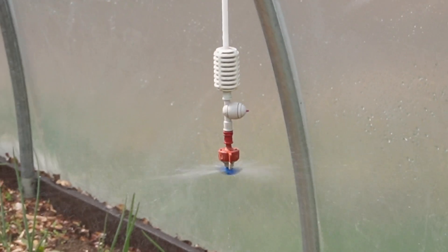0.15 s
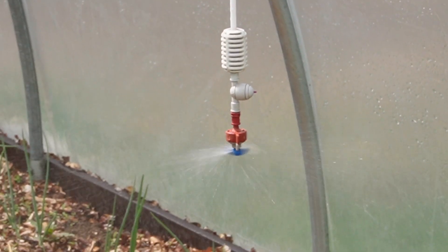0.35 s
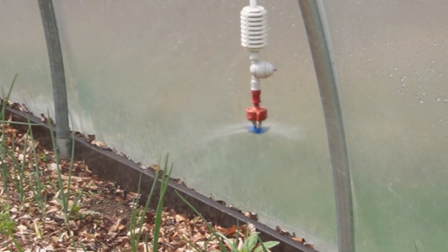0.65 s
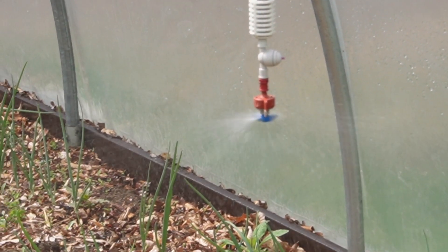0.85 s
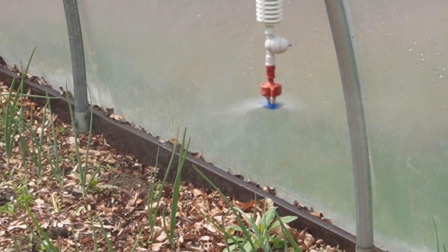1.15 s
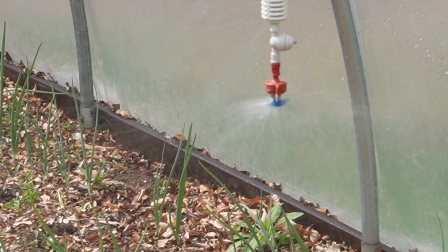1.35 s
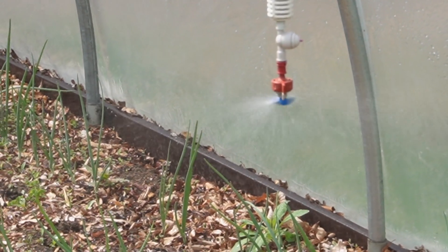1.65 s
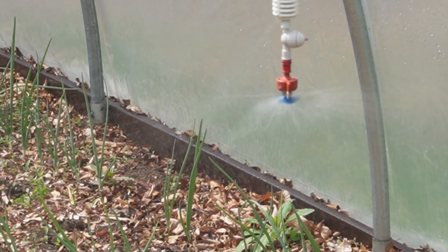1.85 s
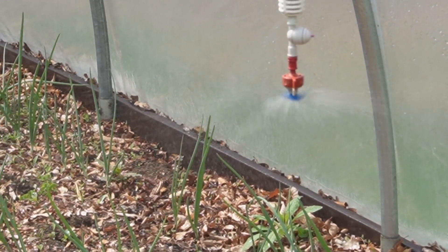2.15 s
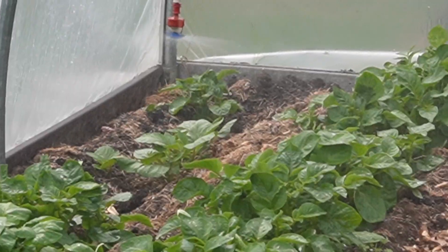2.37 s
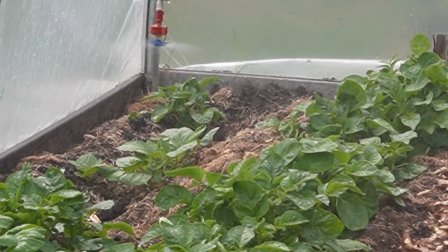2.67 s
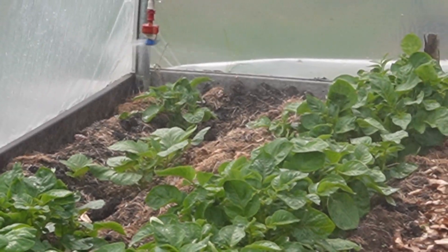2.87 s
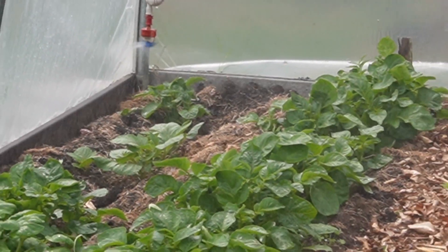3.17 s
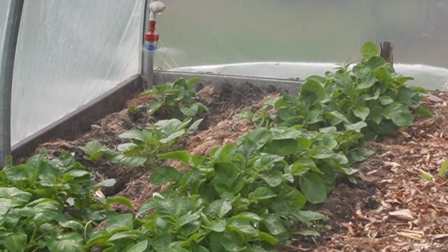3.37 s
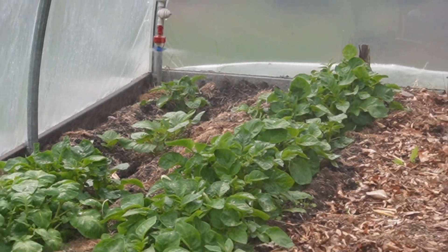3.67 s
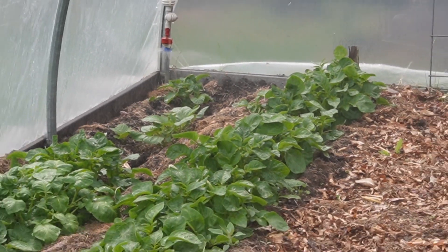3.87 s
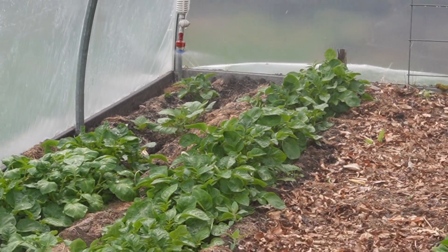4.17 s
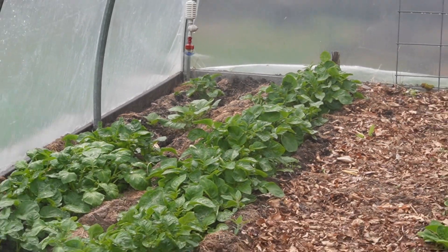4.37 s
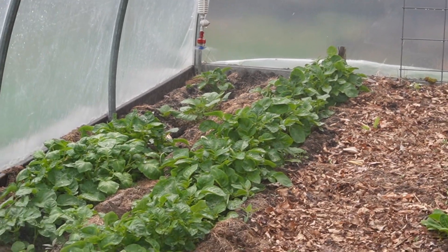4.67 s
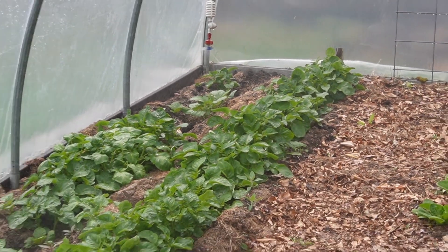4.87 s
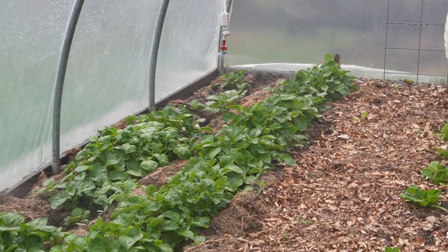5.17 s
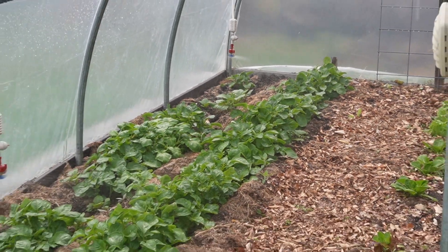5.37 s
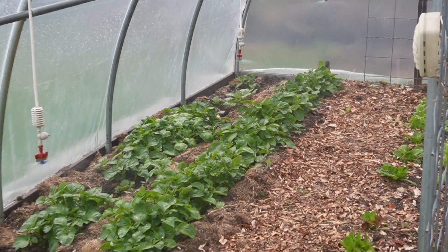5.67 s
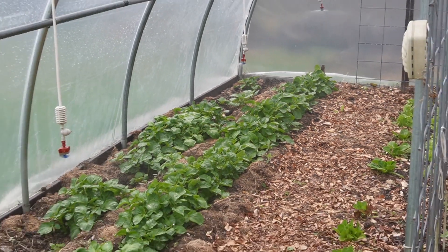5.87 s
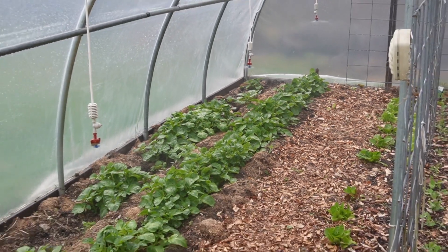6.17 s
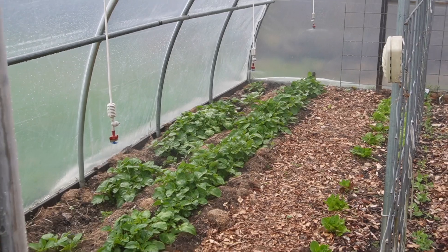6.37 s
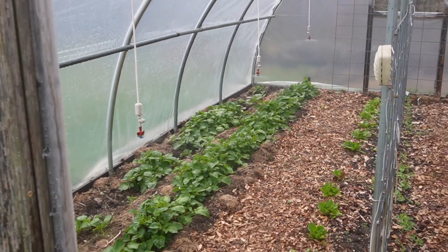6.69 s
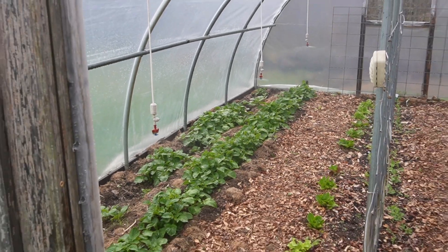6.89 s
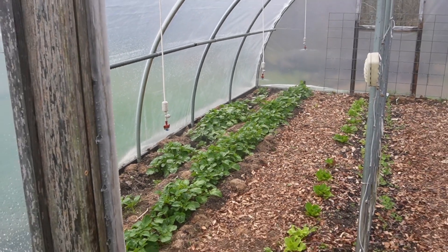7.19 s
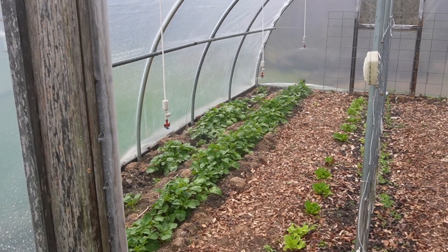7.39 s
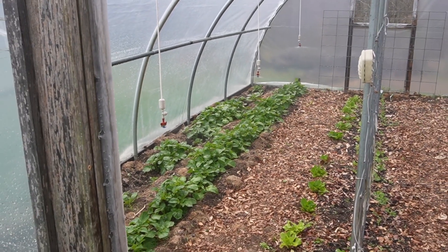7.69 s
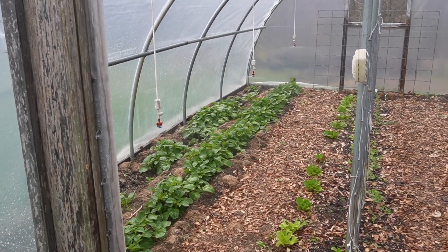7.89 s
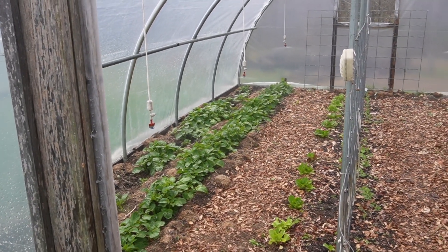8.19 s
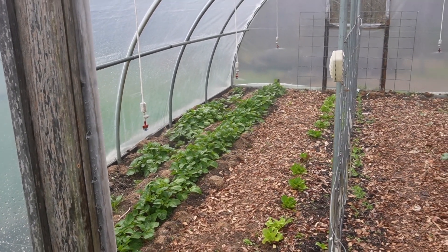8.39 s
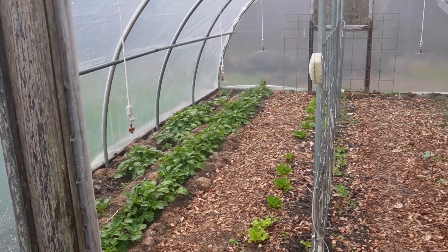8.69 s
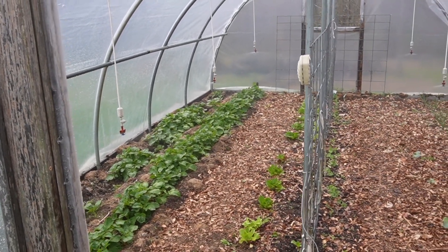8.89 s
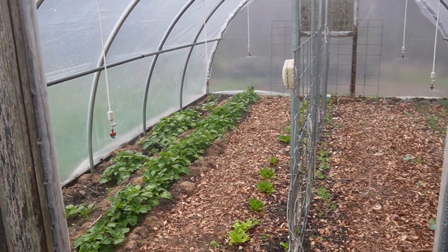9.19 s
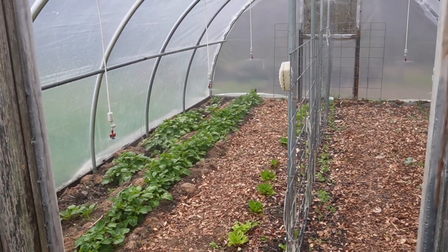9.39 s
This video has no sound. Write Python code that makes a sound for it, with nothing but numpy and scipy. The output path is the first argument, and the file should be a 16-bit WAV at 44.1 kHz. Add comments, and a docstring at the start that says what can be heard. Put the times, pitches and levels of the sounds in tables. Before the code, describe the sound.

A sprinkler head sputters and hisses close by over dense water patter, then cuts to quieter distant spray with small creaks of handling.

```python
"""In a plastic greenhouse tunnel, overhead sprinklers spin: ringing drops over a noise wash patter on sheeting,
leaves and mulch. A head sputters, its tiny impacts and noise gated into spurts; air pops and spray splashes broadly.
Narrow noise bands whistle, fizz and hum; outdoor air rumbles low. Two scenes play: beside one head, then, after a
cut, further down the beds, where the camera shell creaks in the hand as filtered noise bursts and rubs."""
import sys
import numpy as np
from scipy import signal
from scipy.fft import rfft, irfft, next_fast_len
from scipy.io import wavfile
from scipy.ndimage import uniform_filter1d, map_coordinates

SR = 44100
rng = np.random.default_rng(int(sys.argv[2]) if len(sys.argv) > 2 else 0)


def wrap_up_sound(samples):
    """Save the sound to the file named by the first command line argument, as 16-bit audio."""
    columns = np.atleast_2d(samples).T
    # keep every value between -1 and 1, then stretch to whole-number steps
    tamed = np.clip(columns, -1, 1)
    steps = np.round(tamed * 32767).astype(np.int16)
    wavfile.write(sys.argv[1], SR, steps)


N = 420960

CUT_S = 2.355  # the move from beside the head to the beds

# spurts of the sprinkler head: start_s, length_s, level_db, gulps (how many it breaks into)
SPURTS = [(0, 0.012, -20.5, 1), (0.249, 0.065, -22, 1), (0.356, 0.18, -25.5, 2), (.507, 0.294, -22, 1),
          (0.806, .165, -22.5, 1), (.995, .048, -25.5, 1), (1.22, 0.046, -24, 1), (1.594, 0.096, -31, 1),
          (1.748, 0.16, -27, 1), (1.915, 0.055, -23, 1), (2.006, 0.2, -22.5, 1), (2.294, 0.048, -23, 1),
          (2.411, 0.061, -30, 1), (2.577, .034, -33.5, 1), (2.972, 0.2, -31, 3), (3.237, 0.1, -28.5, 1),
          (3.394, 0.03, -28.5, 1), (3.529, .12, -28.5, 3), (3.673, .16, -27.5, 2), (3.911, 0.031, -28, 1),
          (4.251, 0.096, -30, 1), (5.17, .037, -30.5, 1), (5.236, 0.1, -28, 1), (5.385, .042, -27.5, 1),
          (5.718, .023, -29, 1), (5.91, .13, -28, 1), (6.078, .064, -28, 1), (6.357, .031, -33, 1),
          (6.653, 0.087, -35, 2), (6.786, .11, -28, 1), (7.138, 0.088, -28, 2), (7.523, 0.021, -28, 1),
          (7.778, 0.14, -28.5, 1), (7.971, 0.022, -28.5, 1), (8.195, .03, -32, 1), (8.298, 0.037, -30.5, 1),
          (8.424, .061, -28.5, 1), (8.54, .142, -31, 3), (8.958, 0.058, -32, 2), (9.224, .023, -32.5, 1),
          (9.342, 0.2, -33.5, 2)]
# colour of the head's jet: freq_hz, relative density_db per Hz
JET_COLOUR = [(1500, -35.5), (2600, -10.5), (2950, -14), (3500, -0.5), (3900, 2.5), (4500, -3), (5200, -5),
              (6600, -12.5), (9200, -11), (11200, -6.5), (13000, -12.5), (15800, -17)]
# air pockets popping in the nozzle: start_s, peak_db (before the trim in pops)
AIR_POPS = [(0.5531, -2), (3.6865, -12), (7.5263, -17), (7.9044, -12), (8.4392, -12)]
# echo of the jet off a close surface, its path changing as the camera moves: time_s, delay_ms
ECHO_DELAY = [(1.9, .563), (2.4, .612), (5.3, .628), (7.1, .647), (7.9, .632), (9.4, .548)]
# sideways place of the head: time_s, left_minus_right_db
HEAD_LEAN = [(0, 1.1), (.8, 2), (1.6, .9), (2.3, 1.2), (2.4, .1)]
# whistle of the nozzle: centre_hz, width_hz, relative level_db
WHISTLE_BANDS = [(7650, 230, -2), (8600, 530, -12)]
# fizz of the spinner: centre_hz, width_hz, relative level_db
FIZZ_BAND = [(12600, 2000, 0)]
# broad splashes of spray, and one short bright squirt just after the cut:
# start_s, length_s, level_db, pitch_ratio
SPLASHES = [(0.406, 0.047, -24.5, 1.03), (1.131, 0.028, -24, 1.02), (1.604, 0.041, -25.5, 1.1),
            (2.091, 0.035, -21.5, 1), (2.401, 0.025, -31, 2.1)]
# colour of a splash at pitch ratio 1: freq_hz, relative density_db per Hz
SPLASH_COLOUR = [(1000, -24), (1600, -4), (2100, 3), (3100, 6.5), (5000, -4.5), (9000, -1), (11000, -38),
                 (16000, -32)]
# patter of all the drops beside the head: freq_hz, relative density_db per Hz
PATTER_NEAR = [(180, -48), (300, -17), (592, -7), (643, -7), (1080, -2), (1470, -2), (2200, 1), (2720, -1),
               (3920, -2.5), (5740, -8), (8140, -8), (8840, -11.5), (13800, -8), (15800, -15.5)]
# patter of all the drops down the beds: freq_hz, relative density_db per Hz
PATTER_FAR = [(180, -22.5), (300, -14.5), (493, -12), (633, -6), (711, -6.5), (927, -3.5), (1470, -2.5),
              (1920, -0.5), (2910, -1.5), (3270, -0.5), (5120, -7), (7740, -8.5), (9140, -11.5),
              (13200, -11), (15800, -16.5)]
# single creaks and one dull thump of the camera shell:
# start_s, tick_peak_db, thud_peak_db (before the trims in handling)
SINGLE_CREAKS = [(4.582, -15, -41), (4.593, -16, -45), (4.733, -17, -37), (4.99, -18, -34),
                 (5.119, -18, -37), (5.477, -21, -36), (5.555, -19, -35), (5.887, -19, -33),
                 (6.134, -17, -36), (7.07, -34, -36), (7.211, -21, -45)]
# bright resonances of the shell: centre_hz, width_hz, relative level_db
SHELL_TICK = [(2000, 660, 1.5), (2580, 860, 5), (3400, 570, -2.5)]
# dull resonances of the shell: centre_hz, width_hz, relative level_db
SHELL_THUD = [(235, 60, -3), (335, 55, 1), (700, 280, 1), (980, 250, 0), (1350, 300, -1)]
# how hard the hand rubs the shell: time_s, level_db (before the trim in handling)
GRIP_LEVEL = [(4.45, -67), (4.75, -52.5), (5.1, -48.5), (5.3, -59.5), (5.75, -53), (6.5, -52.5),
              (6.75, -61), (7.08, -54), (7.4, -67)]
# colour of the low outdoor rumble: freq_hz, relative density_db per Hz
RUMBLE_COLOUR = [(15, -52), (25, -26), (44, -9), (69, 1), (113, -3), (149, -1), (232, -2.5), (263, -3.5),
                 (400, -20), (520, -36), (880, -120)]
# loudness of the low outdoor rumble: time_s, level_db
RUMBLE_LEVEL = [(0, -57), (1.3, -55), (2.34, -56), (2.38, -64), (2.9, -70), (3.2, -66.5), (4.5, -63.5),
                (5.5, -61.5), (9.5, -64)]
# faint far hum: centre_hz, width_hz, relative level_db
HUM_BAND = [(143, 22, 0)]
# stereo width, nearly mono in the middle, wider low down and in the top treble: freq_hz, side_minus_mid_db
STEREO_WIDTH = [(60, -35), (300, -10.5), (1000, -38.5), (3000, -48), (8000, -56), (12000, -35), (13200, -4),
                (16000, -13)]

GULP_GAP_S = 0.02  # air in the line breaks the flow for this long
SAG_DB_PER_S = 8.5  # a gulp weakens as its pressure drains
DRIBBLE_DB, DRIBBLE_T60_S = -10.5, 0.74  # dribble after a spurt: level relative to it, decay time
SPITS_PER_S, SPIT_S, SPIT_MAX_DB = 1.5, .025, -38.5  # faint stray spits
ECHO_NEAR, ECHO_FAR = .28, .5  # echo gain beside the head and down the beds
NEAR_DB, FAR_DB = -29, -36.5  # patter level beside the head and down the beds
STICK_DB, STICKS_PER_S = 2.5, 14  # the hand sticks and slides unevenly
SOFT_CREAKS_PER_S, SOFT_TICK_DB, SOFT_THUD_DB = 8, -25.5, -39  # mean peaks, before the trims in handling
FIRM_FROM_S, FIRM_TO_S = 4.7, 6.7  # the grip is firm
TOP_HZ = 15850


def amp(db):
    """Decibels to gain."""
    return 10 ** (np.asarray(db) / 20)


def unit(x):
    """Scale to rms 1."""
    return x / np.sqrt(np.mean(x ** 2) + 1e-20)


def along(points, hz):
    """Gain of (Hz, dB) points joined on a log frequency axis."""
    f, db = np.transpose(points)
    return amp(np.interp(np.log(hz + 1), np.log(f), db))


def curve(rows):
    """One value per sample from (s, value) rows."""
    return np.interp(np.arange(N) / SR, *np.transpose(rows))


def wobble(rate, size=N):
    """A smooth random curve with rate knots a second."""
    knots = rng.standard_normal(int(size * rate / SR) + 4)
    return map_coordinates(knots, [np.arange(size) * rate / SR])


def filtered(x, response):
    """Shape the spectrum of x by a function of frequency."""
    n = x.shape[-1]
    m = next_fast_len(n + 4096)
    return irfft(rfft(x, m) * response(np.fft.rfftfreq(m, 1 / SR)), m)[..., :n]


def humps(modes, hz):
    """Gain of broad (Hz, width, dB) resonances whose powers add."""
    return np.sqrt(sum((amp(db) / (1 + (2 * (hz - centre) / width) ** 2)) ** 2 for centre, width, db in modes))


def ringing(modes, hz):
    """Causal response of (Hz, width, dB) resonances of alternating sign."""
    total = 0
    for k, (centre, width, db) in enumerate(modes):
        damping = 1j * hz * width
        total = total + (-1) ** k * amp(db) * damping / (centre * centre - hz * hz + damping)
    return total


def add(track, s, sound):
    """Mix a sound into a track at time s."""
    start = max(round(s * SR), 0)
    part = track[..., start:start + sound.shape[-1]]
    part += sound[..., :part.shape[-1]]


def stereo(pair, colour):
    """Two unrelated signals become a coloured, mostly mono pair whose mid has rms 1."""
    mid, side = filtered(pair, lambda hz: colour(hz) * np.array([np.ones_like(hz), along(STEREO_WIDTH, hz)]))
    return np.array([mid + side, mid - side]) / np.std(mid)


def hiss(colour):
    """A full-length stereo noise of the given colour."""
    return stereo(rng.standard_normal((2, N)), colour)


def impacts(rate, spread_db, size=N):
    """Random drop impacts of uneven size, rms 1."""
    count = int(rate * size / SR) + 1
    size_db = spread_db * np.clip(rng.standard_normal(count), -2.5, 2.5)
    sizes = amp(size_db) * rng.choice([-1, 1], count)
    return unit(np.bincount(rng.integers(0, size, count), sizes, size))


def gush(length, rise, t60):
    """Envelope of a gush of water: quick rise, hold, short fall."""
    t = np.arange(int((abs(length) + .15) * SR)) / SR
    return np.clip(t / rise, 0, 1) * amp(-60 * np.maximum(t - length, 0) / t60)


def flow():
    """Power of the jet: each spurt comes in equal sagging gulps and dribbles out; stray spits fall at random."""
    power = np.zeros(N)
    t = np.arange(SR // 2) / SR
    for s, length, db, gulps in SPURTS:
        period = (length + GULP_GAP_S) / gulps
        gulp = gush(period - GULP_GAP_S, rise=0.014, t60=0.13)
        gulp = gulp * amp(db - SAG_DB_PER_S * np.arange(len(gulp)) / SR)
        for k in range(gulps):
            add(power, s + k * period, gulp ** 2)
        dribble = amp(db + DRIBBLE_DB - 60 * t / DRIBBLE_T60_S)
        same_scene = (s < CUT_S) == (s + length + t < CUT_S)  # no dribble carries over the cut
        add(power, s + length, (same_scene * dribble) ** 2)
    spit = amp(SPIT_MAX_DB) * gush(SPIT_S, rise=0.017, t60=0.12)
    for when, size in rng.random((int(SPITS_PER_S * N / SR), 2)):
        add(power, when * N / SR, size * spit ** 2)
    return power


def patchy(x, depth_db):
    """The colour of a ragged jet wanders in patches a few hundred Hz wide and some 40 ms long."""
    z = signal.stft(x, nperseg=512)[2]
    field = uniform_filter1d(rng.standard_normal(z.shape[1:]), size=5, axis=0)
    field = uniform_filter1d(field, size=7, axis=1)
    return unit(signal.istft(z * amp(depth_db * unit(field)), nperseg=512)[1][:, :N])


def sputter(throb, body_throb_db=0.5, mist_throb_db=3.0, ragged_db=1.12, swell_db=0.73, mist_hz=7000):
    """Each spurt is a shower of tiny impacts; the spinner chops its fine mist more deeply than its body."""
    spray = np.array([impacts(rate=12000, spread_db=3.0) for _ in range(2)]) + rng.standard_normal((2, N))
    jet = stereo(patchy(spray, depth_db=2.5), lambda hz: along(JET_COLOUR, hz))
    mist = filtered(jet, lambda hz: 1 / (1 + (mist_hz / (hz + 1)) ** 8))
    mist_db = curve([(0, -.5), (2.3, 1.5), (2.4, -2.4), (9.5, -2)])  # the finest hiss fades with distance
    body = (jet - mist) * amp(body_throb_db * throb + ragged_db * wobble(110))
    mist = mist * amp(mist_db + mist_throb_db * throb + ragged_db * wobble(110))
    return np.sqrt(flow()) * amp(swell_db * wobble(30)) * (body + mist)


def pops(t60=.012, trim_db=-4):
    """A pocket of air cracks through the head in the jet's colour."""
    out = np.zeros((2, N))
    t = np.arange(SR // 20) / SR
    envelope = np.clip(t / 0.0006, 0, 1) * amp(-60 * np.maximum(t - .002, 0) / t60)
    for s, db in AIR_POPS:
        burst = stereo(rng.standard_normal((2, len(t))), lambda hz: along(JET_COLOUR, hz))
        crack = np.tanh(0.74 * burst)  # squashes the peaks
        add(out, s, amp(db + trim_db) * envelope * crack)
    return out


def echoed(x):
    """The jet and its close echo interfere in a comb that glides with the camera."""
    at = np.arange(N) - curve(ECHO_DELAY) * SR / 1000
    echo = np.array([map_coordinates(side, [at]) for side in x])
    share = np.where(np.arange(N) / SR < CUT_S, ECHO_NEAR, ECHO_FAR)
    return (x + share * echo) / np.sqrt(1 + share ** 2)


def nozzle(throb):
    """The running head whistles thinly and fizzes in time with its spinner."""
    whistle_db = curve([(2.3, -54), (2.4, -48.5), (5.5, -50.5), (7.5, -53.5), (9.5, -49)])
    whistle = amp(whistle_db + 1.5 * wobble(2.99)) * hiss(lambda hz: humps(WHISTLE_BANDS, hz))
    fizz_db = curve([(2.3, -46), (2.4, -48.5), (9.5, -50)])
    fizz = amp(fizz_db + 5.2 * throb + 2.2 * wobble(97)) * hiss(lambda hz: humps(FIZZ_BAND, hz))
    return whistle + fizz


def splashes():
    """Spray lands in short broad showers of impacts; a higher pitch ratio makes a bright squirt."""
    out = np.zeros((2, N))
    for s, length, db, pitch in SPLASHES:
        envelope = gush(length, rise=0.0064, t60=0.12)
        spray = np.array([impacts(rate=8500, spread_db=3, size=len(envelope)) for _ in range(2)])
        add(out, s, amp(db) * envelope * stereo(spray, lambda hz: along(SPLASH_COLOUR, hz / pitch)))
    return out


def droplets(rate, spread_db, cycles):
    """Each drop rings for a few cycles at its own pitch; together they cover all pitches evenly."""
    count = int(rate * N / SR)
    when, pitch, phase = rng.random((count, 3)).T
    hz = 500 * 32 ** pitch  # 500 Hz to 16 kHz
    size_db = spread_db * np.clip(rng.standard_normal(count), -2.5, 2.5)
    size = amp(size_db) * hz ** 1.5 * np.sign(phase - .5)  # short high rings need more size
    k = np.arange(128)
    turns = hz[:, None] * k / SR
    rings = size[:, None] * np.exp(-turns / cycles) * np.sin(2 * np.pi * turns)
    places = (when * N).astype(int)[:, None] + k
    return unit(np.bincount(places.ravel(), rings.ravel(), N)[:N])


def patter():
    """Near drops stand out of a wash of countless far ones."""
    drops = droplets(rate=2600, spread_db=4, cycles=2.8)
    wash = rng.standard_normal((2, N))
    flicker = amp(0.25 * wobble(7) + 0.45 * wobble(60))
    water = np.array([(wash[0] + amp(-5.5) * drops) * flicker, wash[1]])
    near = amp(NEAR_DB) * stereo(water, lambda hz: along(PATTER_NEAR, hz))
    far = amp(FAR_DB) * stereo(water, lambda hz: along(PATTER_FAR, hz))
    moved = curve([(CUT_S - .005, 0), (CUT_S + .005, 1)])
    return (1 - moved) * near + moved * far


def soft_creaks():
    """Rows like SINGLE_CREAKS for the many softer slips of a firm grip."""
    firm_s = FIRM_TO_S - FIRM_FROM_S
    count = int(SOFT_CREAKS_PER_S * firm_s)
    when, size = rng.random((count, 2)).T
    s = FIRM_FROM_S + (np.arange(count) + when) / count * firm_s
    scatter_db = 6 * (size - .5)
    return list(zip(s, SOFT_TICK_DB + scatter_db, SOFT_THUD_DB + scatter_db))


def handling(tick_trim_db=-3, thud_trim_db=5, slip_t60=0.032, apart=0.58, right_tick_db=-4, rub_trim_db=3):
    """Slips of the hand tick and thud in the shell, reaching each microphone a little differently."""
    out = np.zeros((2, N))
    t = np.arange(SR // 10) / SR
    ports = np.array([[1, apart], [1, -apart]])
    for s, tick_db, thud_db in list(SINGLE_CREAKS) + soft_creaks():
        slip = ports @ rng.standard_normal((2, len(t))) * amp(-60 * t / slip_t60)
        tick = filtered(slip, lambda hz: ringing(SHELL_TICK, hz))
        thud = filtered(slip, lambda hz: ringing(SHELL_THUD, hz))
        add(out, s, amp(tick_db + tick_trim_db) * amp([[0], [right_tick_db]]) * tick / np.abs(tick).max())
        add(out, s, amp(thud_db + thud_trim_db) * thud / np.abs(thud).max())
    # between the creaks, many tiny slips stir the same shell
    rub_modes = [(237, 63, -11.0), (335, 32, -2), (820, 460, -11.0), (2110, 490, -11.5)]  # Hz, width Hz, dB
    slips = ports @ np.array([impacts(rate=200, spread_db=3.0) for _ in range(2)])
    rub = unit(filtered(slips, lambda hz: ringing(rub_modes, hz)))
    held = curve([(4.3, 0), (4.6, 1), (7.2, 1), (7.5, 0)])
    rub_db = curve(GRIP_LEVEL) + rub_trim_db + STICK_DB * wobble(STICKS_PER_S)
    return out + held * amp(rub_db) * rub


def rumble():
    """Dull outdoor air under everything, with a faint hum, both as filtered noise."""
    air = amp(curve(RUMBLE_LEVEL)) * hiss(lambda hz: along(RUMBLE_COLOUR, hz))
    hum_db = curve([(2.3, -66), (2.4, -78), (7, -74), (9, -70)])
    return air + amp(hum_db) * hiss(lambda hz: humps(HUM_BAND, hz))


def scene(spin_hz=62):
    """One spinner throbs through the jet and fizz; the head sits a little left while the camera is beside it."""
    spin = spin_hz * (1 + 0.0226 * wobble(6.8))
    throb = np.sin(2 * np.pi * np.cumsum(spin) / SR)
    lean_db = curve(HEAD_LEAN)
    head = echoed(sputter(throb) + pops()) * amp(np.array([lean_db, -lean_db]) / 2)
    return head + nozzle(throb) + splashes() + patter() + handling() + rumble()


def record(dry):
    """Nothing passes above the camera's band limit."""
    return filtered(dry, lambda hz: hz < TOP_HZ)


dry = scene()
out = record(dry)
wrap_up_sound(out)
```